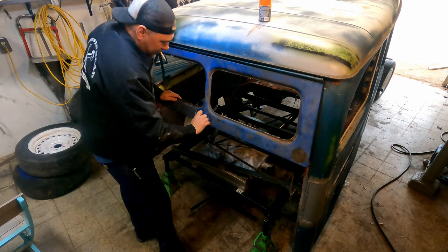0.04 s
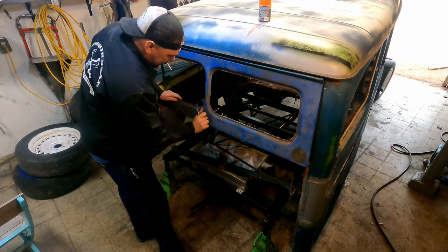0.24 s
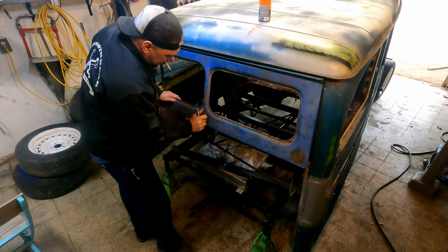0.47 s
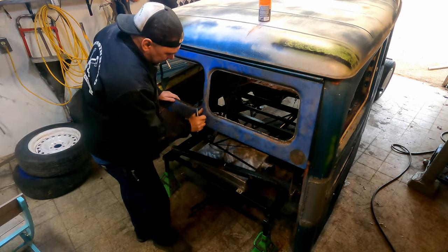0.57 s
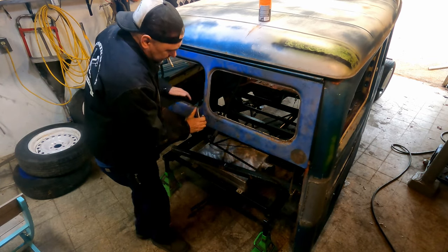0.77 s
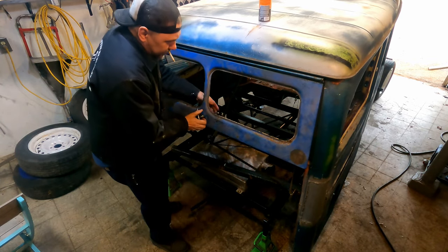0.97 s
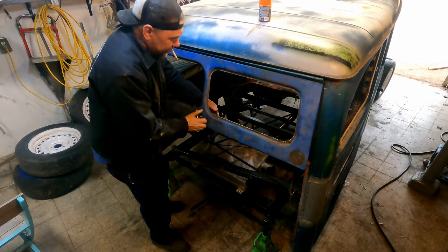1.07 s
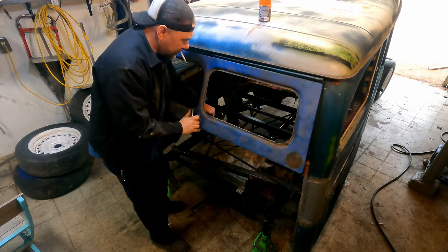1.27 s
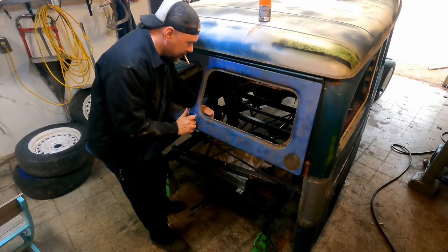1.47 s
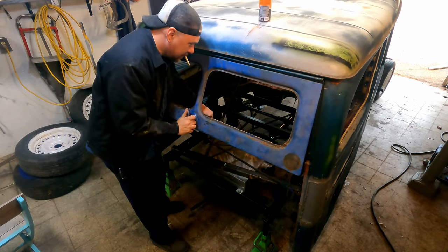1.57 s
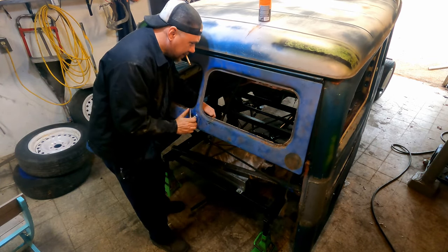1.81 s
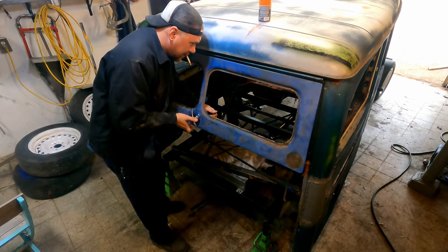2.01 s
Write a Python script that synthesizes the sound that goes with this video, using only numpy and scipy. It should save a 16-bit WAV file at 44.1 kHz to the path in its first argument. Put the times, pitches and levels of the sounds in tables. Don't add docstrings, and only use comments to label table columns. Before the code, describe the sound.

A stiff rusty handle on a steel car door jerks loose with two loud bright clanks and a low panel boom, then gritty scrapes, a small rattle, a ringing knock and a dull bump, close in a humming garage.

```python
import sys
import numpy as np
from scipy import signal
from scipy.fft import rfft, irfft
from scipy.io import wavfile

SR = 44100
rng = np.random.default_rng(int(sys.argv[2]) if len(sys.argv) > 2 else 0)


def volts_from_decibels(level):
    exponent = np.asarray(level, float) / 20
    return 10 ** exponent


def pcm_store(signal):
    levels = np.round(np.clip(np.atleast_2d(signal), -1, 1) * 32767)
    wavfile.write(sys.argv[1], SR, levels.astype(np.int16).T)


N = 90404
T = np.arange(N) / SR

# frequency in Hz, level in dB.
AIR_SPECTRUM = [(15, -33), (30, -2.5), (129, 0.5), (198, -20.5), (305, -15.5), (871, -31), (5280, -35),
                (8000, -39), (12200, -50.5), (15500, -80)]
# frequency in Hz, level in dB.
MAINS_LINES = [(119, -41.5)]
# frequency in Hz, correlation from 0 to 1.
EAR_LIKENESS = [(60, 1), (130, 1), (550, 0.83), (1650, 0.47), (4970, 0.67), (15000, 0.88)]
# time in seconds, frequency in Hz, level in dB.
SKIN_BOOM = [(0.0, 70.7, -36.5), (0.06, 66.9, -27.5), (0.14, 67.7, -40.5), (0.27, 73.05, -41.5),
             (0.35, 68.1, -17), (0.44, 69.16, -18.5), (0.5, 68.9, -14), (0.601, 68.5, -20.5),
             (0.73, 67.8, -16.5), (0.84, 72.36, -31.5), (0.94, 71.26, -25), (1.31, 71.5, -41.5),
             (1.39, 67, -29), (1.72, 66.4, -42), (1.75, 65.4, -24.5), (1.761, 65, -50), (1.97, 66.7, -66),
             (2.05, 64, -50)]
# start in seconds, chatter in seconds, then level in dB into the low panel,
# the mid panel and the thin bright parts.
KNOCKS = [
    (0.046, 0.0036, -44.5, -41, -41),
    (0.053, 0.016, -40.5, -42.5, -65),
    (0.216, 0.021, -40, -16.5, -18.5),
    (0.354, 0.015, -31, -21, -18),
    (.366, 0.038, -13.5, -18, -26),
    (1.068, 0.032, -44, -41, -29),
    (1.542, 0.01, -46, -34, -34),
    (1.96, 0.0064, -62, -78, -69),
]
# start in seconds, length in seconds, then low, mid and bright
# levels in dB.
SCRAPES = [(0.093, 0.071, -56, -50.5, -61), (0.16, 0.11, -53, -47.5, -58),
           (0.237, 0.083, -25, -26.5, -38.5), (0.457, 0.13, -34, -45.5, -42.5), (0.601, .12, -82, -40, -31),
           (0.715, 0.065, -40.5, -45, -56), (0.881, 0.056, -44, -63, -41), (0.777, 0.095, -44.5, -50, -77),
           (0.946, 0.065, -55, -51.5, -56), (1.051, 0.032, -43, -48, -42.5), (1.359, 0.12, -47.5, -58, -54),
           (1.451, 0.09, -40, -41, -58), (1.542, 0.068, -34.5, -28.5, -41), (1.596, 0.11, -38.5, -40, -61),
           (1.689, 0.079, -37.5, -36, -51.5), (1.74, 0.2, -47.5, -50.5, -60),
           (1.89, 0.2, -38.5, -44.5, -56.5)]
# lower edge in Hz, upper edge in Hz.
DOOR_REGIONS = [(190, 623), (780, 1960), (1800, 6950), (5600, 9100)]
# frequency in Hz, level in dB per Hz.
SHEET_SPECTRUM = [(88, -50), (150, -1.5), (312, 3), (343, 2), (636, -0.5), (772, -8), (1070, -7),
                  (4210, -21.5), (15000, -76)]
# frequency in Hz, t60 in seconds.
SHEET_T60 = [(150, .22), (600, .16), (2500, .11), (12000, .07)]
# frequency in Hz, level in dB, t60 in seconds.
STRONG_MODES = [(231, 6, .35), (268, 4, .3), (312, 19, .34), (393, 10, .3), (449, 3, .25), (659, 4, .25),
                (724, 7, .25), (1010, 7, .22), (1095, 4, .22), (1303, 6, .3), (1787, 2, .2), (4250, 6, .03)]
# frequency in Hz, level in dB.
DOOR_WIDTH = [(150, -13.5), (500, -3), (2000, -1.5), (8000, 8)]
# time in seconds, frequency in Hz, level in dB, t60
# in seconds.
CLINKS = [(0.048, 2580, -35, .03), (0.0546, 2500, -31, 0.045), (.058, 3200, -35, 0.034),
          (.0465, 880, -29, 0.033), (.066, 1680, -33, 0.072), (.094, 700, -28, .05),
          (0.1207, 3750, -23.5, 0.015), (.1198, 6500, -35, .012), (.1272, 3840, -35, .012),
          (.158, 2010, -34, 0.034), (.2168, 882, -3.5, 0.038), (.226, 1030, -1, 0.057),
          (.225, 1320, -2.5, .06), (.2255, 1663, -3, 0.056), (.228, 2545, -9.5, 0.11),
          (.234, 459, -9, 0.18), (.26, 1022, -4, 0.055), (.266, 1910, -5.5, 0.032),
          (.276, 1000, -3.5, 0.041), (0.293, 1327, -12, 0.088), (0.303, 1480, -12.5, 0.066),
          (.357, 1694, -8, 0.055), (.358, 2610, -14, .03), (0.368, 4200, -7, 0.046),
          (.366, 2110, -8.5, 0.03), (0.381, 4350, -13, 0.037), (.42, 3830, -16, .03),
          (.474, 1594, -16, .03), (.64, 227, -24.5, .12), (0.709, 251, -19.5, .12), (.85, 213, -27.5, .12),
          (1.064, 281, -24, 0.085), (1.065, 402, -21, 0.11), (1.086, 377, -25, 0.054),
          (1.075, 948, -24, 0.17), (1.505, 1200, -32, 0.035), (1.553, 1506, -14.5, 0.054),
          (1.567, 950, -12.5, 0.067), (1.582, 622, -14.5, 0.058), (1.589, 7500, -33, 0.016),
          (1.648, 683, -16.5, 0.11), (1.674, 940, -21.5, 0.093), (1.714, 581, -14.5, .1),
          (1.722, 825, -16, .05), (1.752, 818, -21, 0.066), (1.768, 1222, -24, .07), (1.782, 252, -24, 0.1),
          (1.805, 550, -22.5, 0.06), (1.838, 560, -26.5, 0.049), (1.951, 1630, -30.5, .08)]
# frequency in Hz, t60 in seconds.
GARAGE_T60 = [(100, 0.73), (500, 0.38), (2000, 0.37), (6000, 0.25), (14000, 0.23)]
# start in seconds, length in seconds, frequency in Hz, level in dB.
SQUEAKS = [
    (.295, .045, 1350, -21),
    (.69, .02, 2100, -30),
    (1.37, .06, 1600, -43),
    (1.39, .09, 5400, -50),
    (1.46, .07, 4120, -47),
    (1.68, .05, 5050, -50),
]
# frequency in Hz, level in dB, t60 in seconds.
HANDLE_MODES = [(452, -1, .45), (727, -3, .25), (936, -4, .3), (1028, 1, .5), (1319, -3, .45),
                (1540, -2, .3), (1986, -9.5, .6), (2185, -12, .2), (3467, -10, .17), (4011, -3, .17),
                (4484, -6, .27), (4990, -3, .19), (5545, -15, .8), (6050, -22, .12)]


def at_hz(points, hz):
    table = np.array(points)
    return np.interp(np.log(hz), np.log(table[:, 0]), table[:, 1])


def rms_one(x):
    return x / np.sqrt(np.mean(x ** 2) + 1e-20)


def band(x, low_hz, high_hz):
    return signal.sosfilt(signal.butter(2, [low_hz, high_hz], "band", fs=SR, output="sos"), x)


def half_sine(start_s, length_s):
    return np.sin(np.pi * np.clip((T - start_s) / length_s, 0, 1))


def drift(rate_hz):
    every = 40
    pole = np.exp(-2 * np.pi * rate_hz * every / SR)
    white = rng.standard_normal(N // every + 2002)
    slow = signal.lfilter([1], [1, -2 * pole, pole * pole], white)[2000:]
    return np.interp(np.arange(N) / every, np.arange(len(slow)), rms_one(slow))


def modes(hz, db, t60, ears=1):
    t = T[:SR // 3]
    decay = np.exp(-np.log(1000) * t / np.c_[t60])
    return (volts_from_decibels(db) * ears) @ (decay * np.sin(2 * np.pi * np.c_[hz] * t))


def stereo_noise(gain, size):
    out = 0
    edges = 22 * 2 ** np.arange(0, 9.6, .5)
    white = rng.standard_normal((2, 2, size))
    for k, (low, high) in enumerate(zip(edges, edges[1:])):
        mid, side = band(white[k % 2], low, high)
        hz = np.sqrt(low * high)
        alike = np.clip(at_hz(EAR_LIKENESS, hz), 0, 1)
        pair = np.sqrt(1 + alike) * mid + np.sqrt(1 - alike) * side * [[1], [-1]]
        out = out + gain(hz) * pair
    return out


def hum():
    air_db, fizz_db, fizz_band = -36, -67, (11000, 13000)
    air = stereo_noise(lambda hz: volts_from_decibels(at_hz(AIR_SPECTRUM, hz) + 1.96 * drift(2.2)), N)
    hiss = band(rng.standard_normal((2, N)), *fizz_band)
    out = volts_from_decibels(fizz_db) * rms_one(band(hiss, *fizz_band)) + volts_from_decibels(air_db) * rms_one(air)
    for hz, db in MAINS_LINES:
        out = out + volts_from_decibels(db + 3.2 * drift(7.3)) * np.sin(2 * np.pi * hz * T)
    return out


def boom():
    wobble_db, shake_db, shake_top_hz = 3, -10, 54
    s, hz, db = np.transpose(SKIN_BOOM)
    phase = 2 * np.pi * np.cumsum(np.interp(T, s, hz)) / SR
    tone = np.sqrt(2) * volts_from_decibels(wobble_db * drift(12)) * np.sin(phase + [[.06], [-.06]])
    mid, side = band(rng.standard_normal((2, N)), 24.8, shake_top_hz)
    rocking = rms_one(mid + 0.046 * side * [[1], [-1]])
    return volts_from_decibels(np.interp(T, s, db)) * (tone + volts_from_decibels(shake_db) * rocking)


def door_modes(hz, db, t60):
    side = volts_from_decibels(at_hz(DOOR_WIDTH, hz)) * rng.choice([-1, 1], len(hz))
    return modes(hz, db + at_hz(SHEET_SPECTRUM, hz), t60, 1 + np.c_[[1, -1]] * side)


def door_response():
    spread_db, held_db = 1.5, -7.5
    hz = np.geomspace(170, 14500, 360) * np.exp(rng.uniform(-.005, .005, 360))
    t60 = at_hz(SHEET_T60, hz)
    db = spread_db * rng.standard_normal(len(hz)) + 10 * np.log10(hz / 1000 / t60)
    sheet = door_modes(hz, db, t60)
    strong = door_modes(*np.transpose(STRONG_MODES))
    return sheet + strong, sheet + volts_from_decibels(held_db) * strong


def rust_grit():
    grains_per_s, spread_db = 3500, 3.5
    hits = rng.random((4, N)) < grains_per_s / SR
    size = volts_from_decibels(spread_db * np.minimum(rng.exponential(1, (4, N)), 5))
    return rms_one(hits * size * rng.choice([-1, 1], (4, N)))


def hand_force():
    rise_s, let_go_s = .003, 0.014
    knock_hiss_db, scrape_hiss_db = -32, -8
    force = np.zeros((4, N))
    for s, hold_s, *db in KNOCKS:
        rise = np.clip((T - s) / rise_s, 0, 1)
        release = np.exp(-np.clip(T - s - hold_s, 0, 1) / let_go_s)
        force += np.c_[volts_from_decibels(np.r_[db, db[-1] + knock_hiss_db])] * rise * release
    for s, length_s, *db in SCRAPES:
        force += np.c_[volts_from_decibels(np.r_[db, db[-1] + scrape_hiss_db])] * half_sine(s, length_s)
    return force


def handle_work():
    held_s = .58
    direct_db, dull_hz = -4.5, 15300
    push = hand_force() * rust_grit()
    out = 0
    for body, when in zip(door_response(), [T < held_s, T >= held_s]):
        for region_push, (low, high) in zip(push * when, DOOR_REGIONS):
            part = band(body, low, high)
            onset = 2 + volts_from_decibels(direct_db) * np.exp(-T[:part.shape[1]] * 400)
            part = part / np.linalg.norm(part[0]) * onset
            out = out + signal.fftconvolve(region_push[None], part, axes=1)[:, :N]
    return signal.sosfilt(signal.butter(4, dull_hz, fs=SR, output="sos"), out)


def clinks():
    rise_s = .0008
    out, t = np.zeros((2, N + SR)), T[:SR // 5]
    for (s, hz, db, t60), lean in zip(CLINKS, rng.uniform(-0.23, 1, len(CLINKS))):
        t60 = np.clip(t60, .008, min(.12, 130 / hz))
        ping = volts_from_decibels(db - 60 * t / t60) * (1 - np.exp(-t / rise_s))
        start = int(s * SR)
        out[:, start:start + len(t)] += ping * np.sin(2 * np.pi * hz * t + .5 * lean * np.c_[[1, -1]])
    return out[:, :N]


def garage(x):
    level_db, first_echo_s = -8, 0.0062
    t = T[:SR]

    def decay(hz):
        t60 = at_hz(GARAGE_T60, hz)
        return np.exp(-np.log(1000) * t / t60) / np.sqrt(t60)

    tail = stereo_noise(decay, len(t)) * np.clip(t / first_echo_s - 1, 0, 1)
    return volts_from_decibels(level_db) * signal.fftconvolve(x[None], tail / np.linalg.norm(tail[0]), axes=1)[:, :N]


def squeaks():
    cycles_per_hz = np.cumsum(1 + .004 * drift(40)) / SR
    out = np.zeros(N)
    for s, length_s, hz, db in SQUEAKS:
        out += volts_from_decibels(db) * half_sine(s, length_s) * np.sin(2 * np.pi * hz * cycles_per_hz)
    return out


def handle_ring():
    blow_s, blow_db, rise_s = 1.542, -19, 0.013
    grip_s, grip_fade_s = 1.685, .012
    blow = np.zeros(N)
    blow[int(blow_s * SR)] = volts_from_decibels(blow_db)
    ring = signal.fftconvolve(blow, modes(*np.transpose(HANDLE_MODES)))[:N]
    rise = 1 - np.exp(-np.clip(T - blow_s, 0, 1) / rise_s)
    return ring * rise * np.exp(-np.clip(T - grip_s, 0, 1) / grip_fade_s)


def bump():
    bump_s, bump_db, width_s = 1.7446, -4.5, .0038
    lead_s, lead_db, tick_s, tick_db = .0012, -8, .0006, -6
    push = -np.sin(np.pi * np.clip((T - bump_s) / width_s, 0, 1) ** .7) ** 1.4
    rise = volts_from_decibels(lead_db) * np.sqrt(np.abs(half_sine(bump_s - lead_s, lead_s)))
    dip_time = np.clip((T - bump_s + lead_s) / tick_s + 1, 0, 1)
    dip = -volts_from_decibels(tick_db) * np.sin(np.pi * np.sqrt(dip_time))
    microphone = signal.butter(1, [30, 11000], "band", fs=SR, output="sos")
    return volts_from_decibels(bump_db) * signal.sosfilt(microphone, push + rise + dip)


def scene():
    lag_samples = .6
    ambience, skin = hum(), boom()
    near = handle_work() + clinks() + squeaks() + handle_ring()
    thump = bump()
    echoes = garage(near.mean(axis=0) + volts_from_decibels(-4.5) * thump)
    out = volts_from_decibels(-4) * near + echoes + skin + thump + ambience
    late = np.exp(-1j * np.pi * lag_samples * np.linspace(0, 1, N // 2 + 1))
    return np.array([irfft(rfft(out[0]) * late, N), out[1]])


def roll_off(x):
    return signal.sosfilt(signal.butter(12, 15740, fs=SR, output="sos"), x)


def record(dry):
    clipped = dry / (1 + np.abs(dry) ** 20) ** (1 / 20)
    return roll_off(clipped)


dry = scene()
out = record(dry)
pcm_store(out)
```